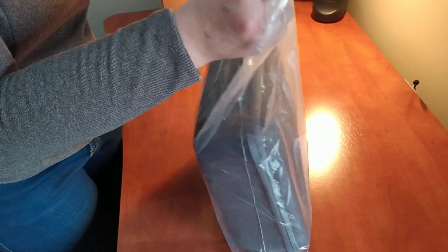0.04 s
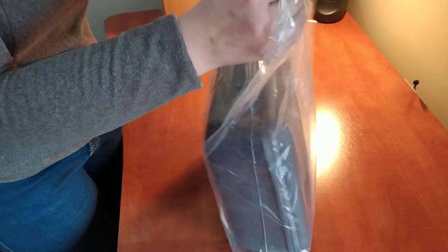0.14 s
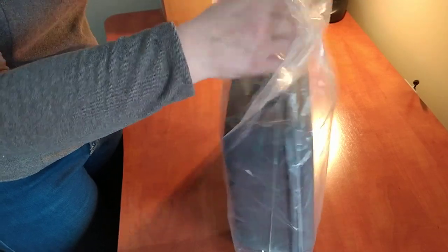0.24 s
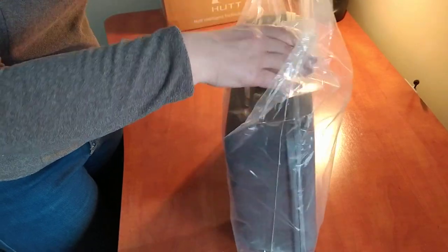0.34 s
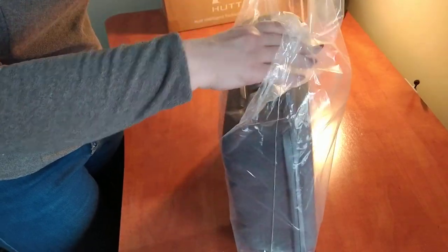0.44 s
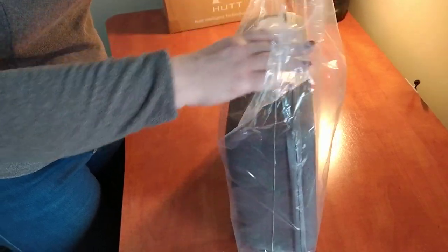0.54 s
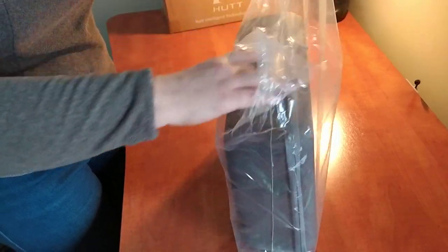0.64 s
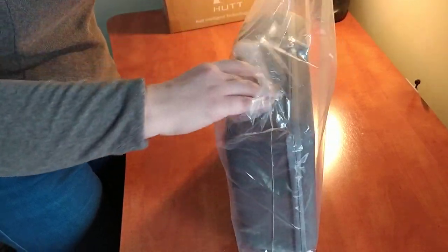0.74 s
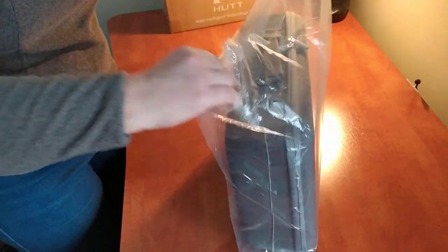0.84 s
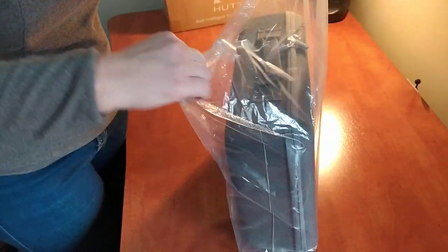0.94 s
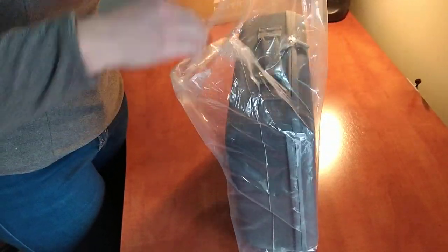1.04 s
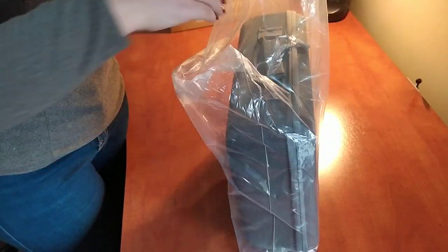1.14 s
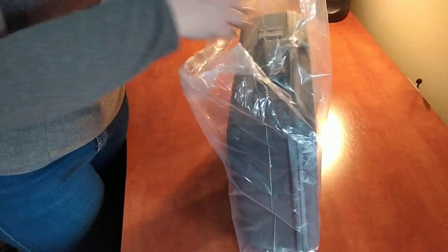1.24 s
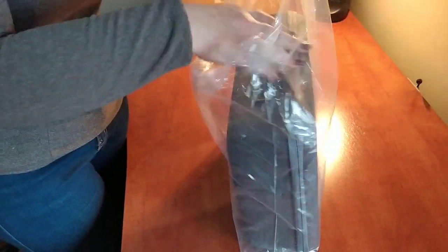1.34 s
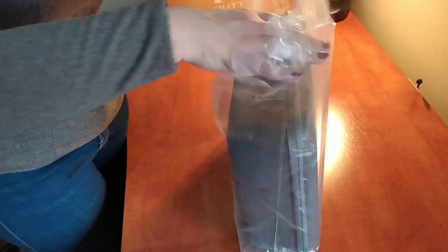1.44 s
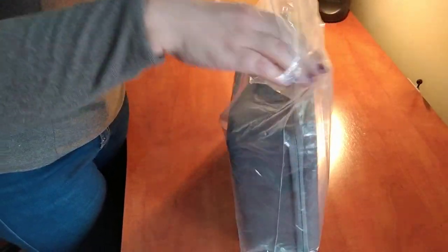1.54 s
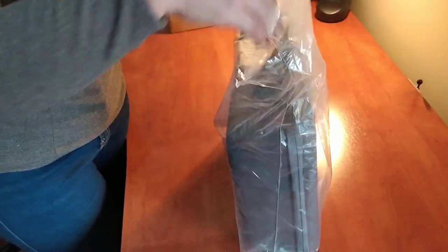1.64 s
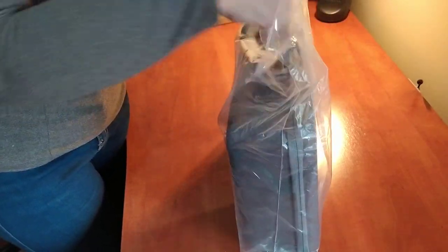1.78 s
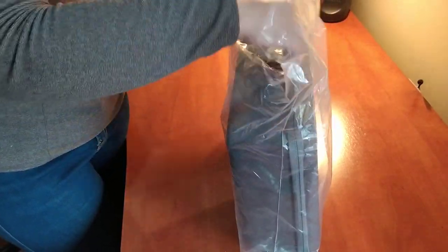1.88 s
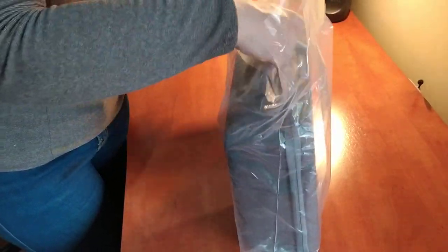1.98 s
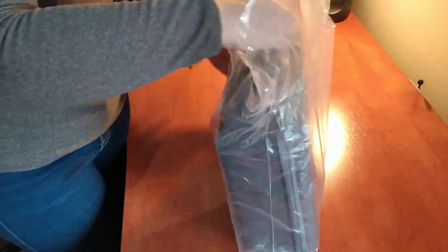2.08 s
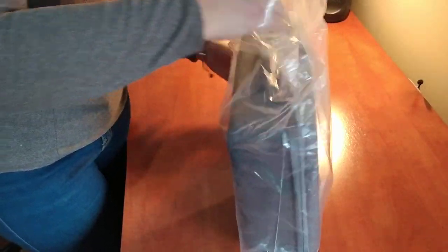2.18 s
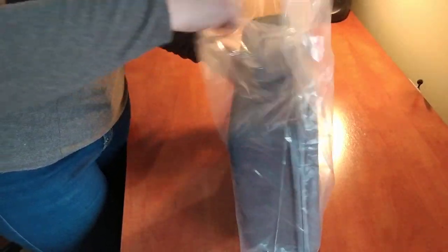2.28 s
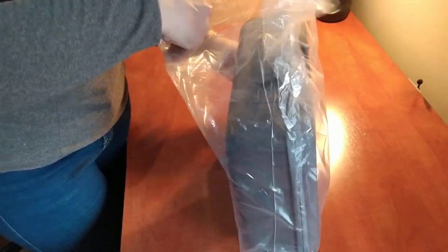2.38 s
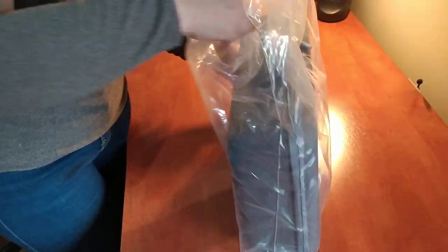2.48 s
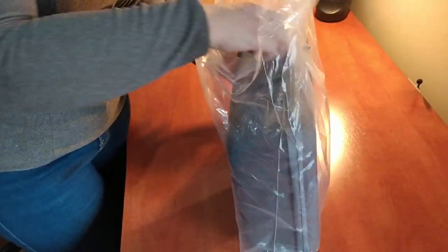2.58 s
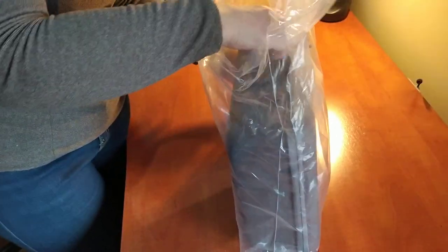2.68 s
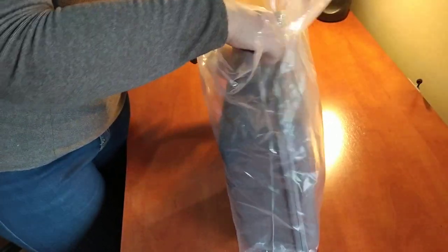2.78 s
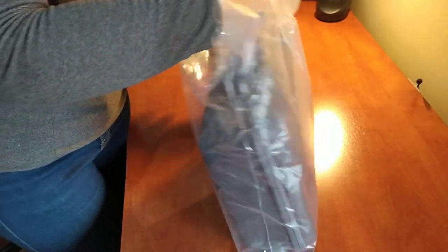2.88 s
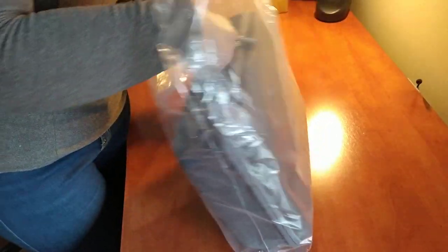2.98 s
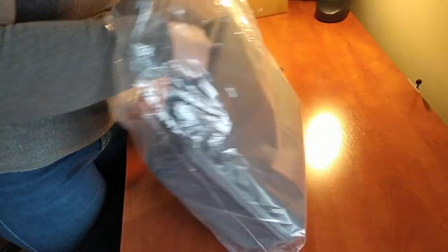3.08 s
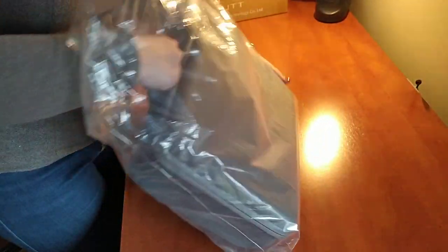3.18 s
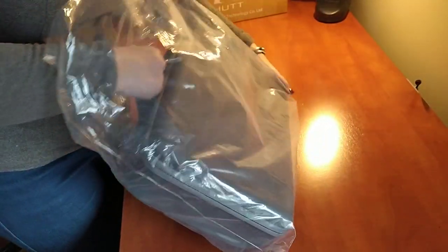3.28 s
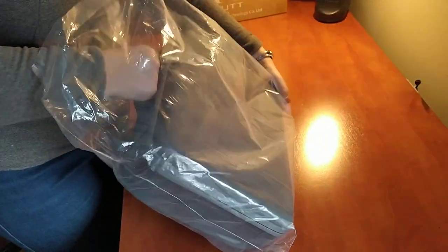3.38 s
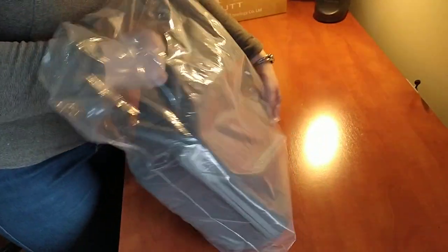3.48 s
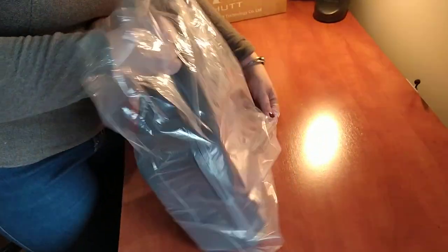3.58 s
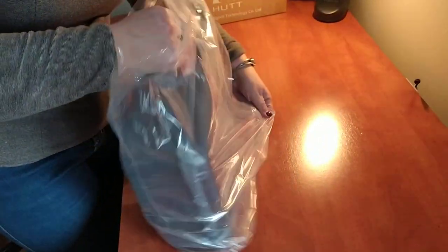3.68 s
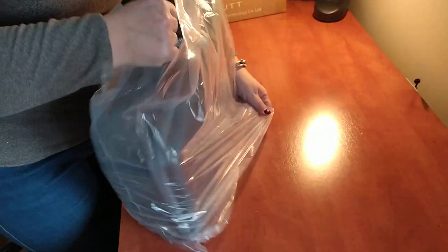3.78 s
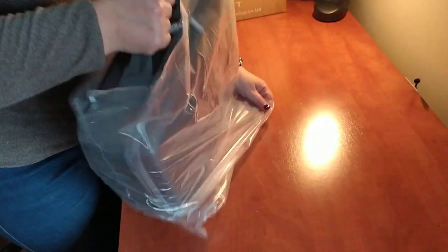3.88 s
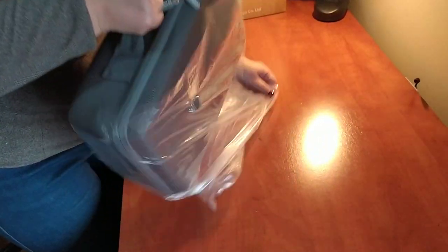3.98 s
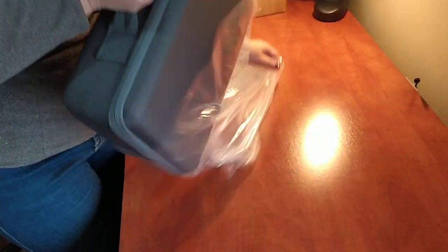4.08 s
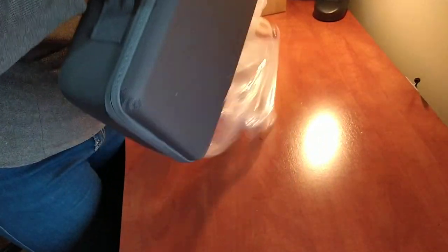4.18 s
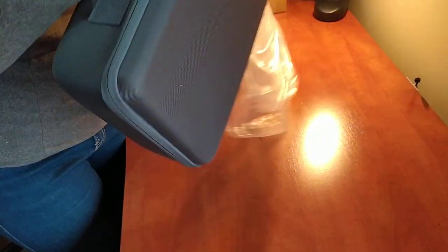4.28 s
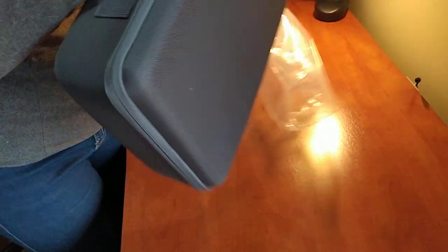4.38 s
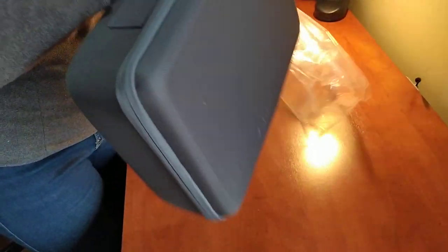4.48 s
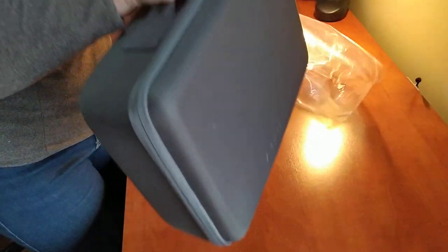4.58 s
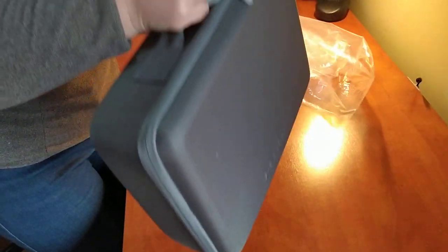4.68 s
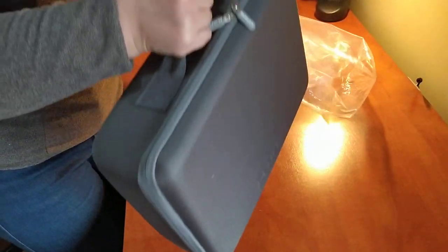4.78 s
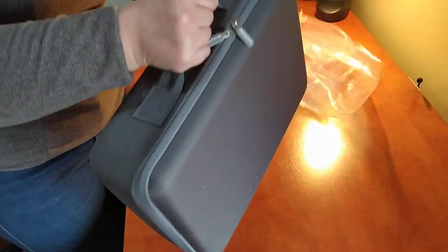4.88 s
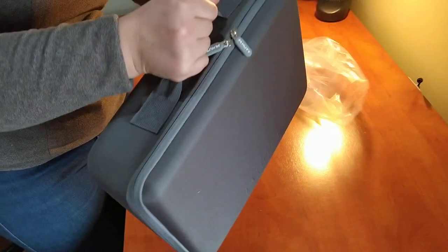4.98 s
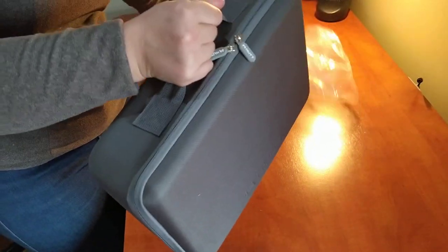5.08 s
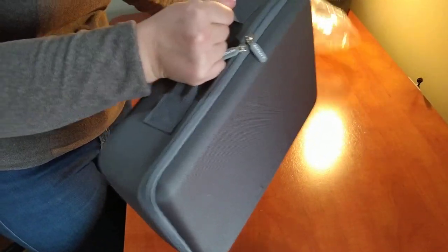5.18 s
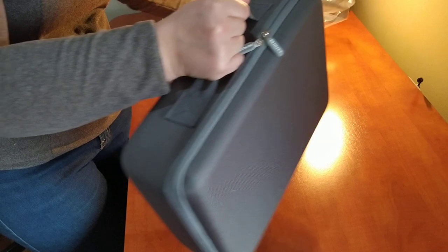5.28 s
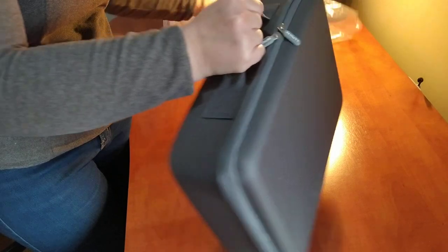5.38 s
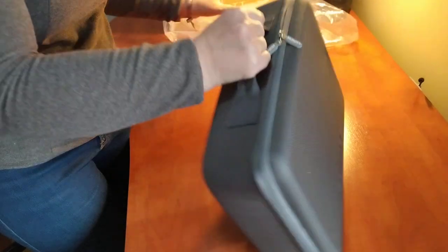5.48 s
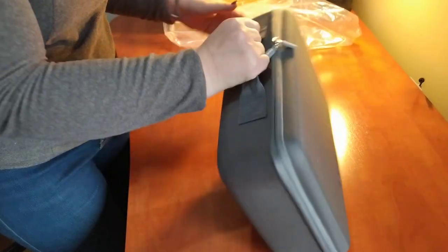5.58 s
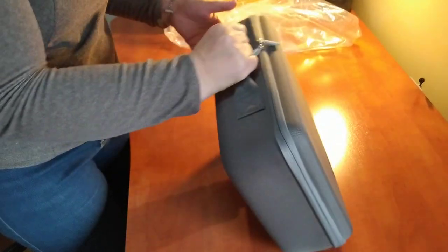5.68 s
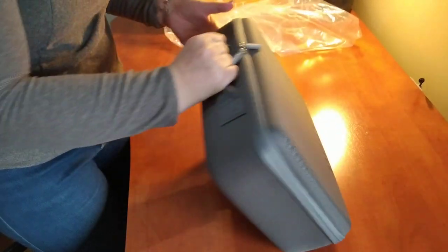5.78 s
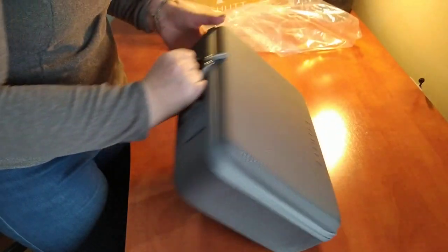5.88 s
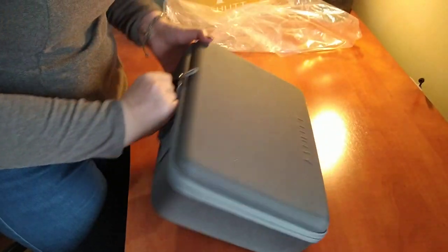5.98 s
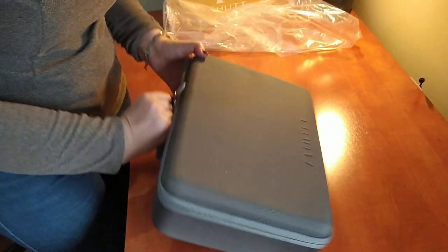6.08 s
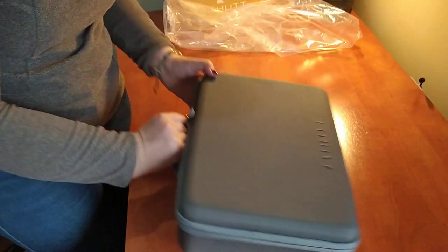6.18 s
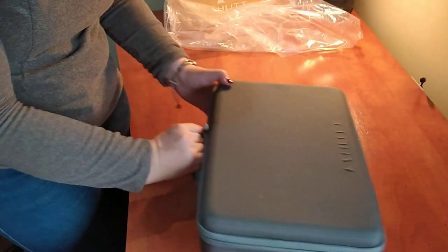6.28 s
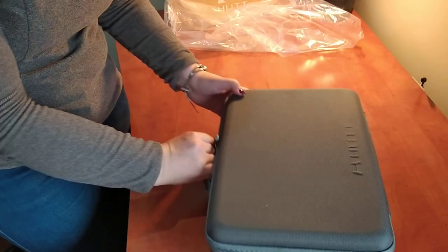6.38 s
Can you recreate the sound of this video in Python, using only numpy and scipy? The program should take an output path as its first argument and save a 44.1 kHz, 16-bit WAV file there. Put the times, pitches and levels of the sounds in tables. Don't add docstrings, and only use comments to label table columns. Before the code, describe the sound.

Close, bright plastic rustling with sharp crackles and small bumps, ending in a rattling double thump as a hollow case drops flat on a table.

```python
import sys
import numpy as np
from scipy import signal
from scipy.fft import rfft, irfft, next_fast_len
from scipy.io import wavfile
from scipy.ndimage import uniform_filter1d, minimum_filter1d

SR = 44100
rng = np.random.default_rng(int(sys.argv[2]) if len(sys.argv) > 2 else 0)


def natural_amplitude(level_db):
    exponent = np.asarray(level_db, float) / 20
    return 10 ** exponent


def store_wav(level_fs):
    pcm = np.round(np.clip(np.atleast_2d(level_fs), -1, 1) * 32767)
    wavfile.write(sys.argv[1], SR, pcm.T.astype(np.int16))


N = 283987
SIZE = next_fast_len(N + SR)
HZ = np.maximum(np.arange(SIZE // 2 + 1) * SR / SIZE, 1)
ROOM_DB = -13

# (frequency [Hz], density [dB per Hz])
WIDE_TONE = [(320, -26.5), (550, -18.5), (679, -9.5), (901, -7), (1210, -7.5), (1590, -3), (2480, 0.5),
             (3210, -4.5), (3800, -6.5), (4940, -15.5), (8360, -120)]
# (time [s], wide folds over fine creases [dB], weight on table [dB], left-right [dB])
GRIP = [(0, -7, -20.5, -1), (.45, -9, -22, 0.5), (.75, -5, -21, -1), (1.1, -8.5, -22, -0.5),
        (1.6, -7.5, -19, -0.5), (2, -7, -18.5, -1.5), (2.5, -5.5, -19.5, 0), (2.9, -6, -13, -1),
        (3.3, -7, -15.5, -1), (3.7, -8, -22, 0), (4.2, -7.5, -18, 1.5), (4.55, -10, -29, -1),
        (4.9, -3.5, -18.5, -2), (5.2, -7, -19, -0.5), (5.6, -4, -17, -3), (5.9, -3, -14, -0.5),
        (6.15, -2.5, -2.5, 5), (6.44, -12.5, -10.5, -2)]


def rms_one(x):
    return x / np.sqrt(np.mean(x ** 2) + 1e-20)


def in_time(rows):
    s, *columns = np.transpose(rows)
    return [np.interp(np.arange(N) / SR, s, c) for c in columns]


def at_hz(points):
    hz, value = np.transpose(points)
    return np.interp(np.log(HZ), np.log(np.maximum(hz, 1)), value)


def colour(x, points):
    magnitude = rms_one(natural_amplitude(np.maximum(at_hz(points), -70)))
    cepstrum = irfft(np.log(magnitude), SIZE)
    cepstrum[1:SIZE // 2] *= 2
    cepstrum[SIZE // 2 + 1:] = 0
    return irfft(rfft(x, SIZE) * np.exp(rfft(cepstrum)), SIZE)[..., :N]


def fade(x, decay_s):
    return signal.lfilter([1], [1, -np.exp(-1 / (decay_s * SR))], x + 1e-18)


def drift(rate_hz):
    decay_s = 1 / (2 * np.pi * rate_hz)
    slow = fade(fade(rng.standard_normal(N + SR), decay_s), decay_s)
    return rms_one(slow[SR:])


def ring(clicks, modes, gains_db=0):
    out = 0
    gains_db = gains_db + np.zeros(len(modes))
    for k, ((hz, level_db, t60_s), gain_db) in enumerate(zip(modes, gains_db)):
        r = natural_amplitude(-60 / (t60_s * SR))
        w = 2 * np.pi * hz / SR
        mode = signal.lfilter([0, np.sin(w)], [1, -2 * r * np.cos(w), r * r], clicks + 1e-18)
        out = out + (-1) ** k * natural_amplitude(level_db + gain_db) * mode
    return out


def ticks(per_s, spread_db, tick_s, clump_db, smooth):
    born = rng.random(N) < per_s * natural_amplitude(clump_db * drift(14)) / SR
    power = natural_amplitude(2 * spread_db * np.minimum(rng.exponential(1, N), 4)) * born
    gate = fade(power, tick_s)
    gate = np.sqrt((1 - smooth) * gate / gate.mean() + smooth)
    return gate * rng.standard_normal((2, N))


def strokes(rows, rest_db):
    s, level_db, rise_s, hold_s, fall_s = np.transpose(rows)[..., None]
    t = np.arange(0, N + 128, 128) / SR
    before = np.maximum(s - t, 0) / np.maximum(rise_s, .005)
    after = np.maximum(t - s - np.abs(hold_s), 0) / np.maximum(fall_s, .005)
    sunk_db = 20 * np.minimum(before + after, 10)
    power = np.sum(natural_amplitude(level_db - sunk_db) ** 2, axis=0) + natural_amplitude(rest_db) ** 2
    return np.interp(np.arange(N) / SR, t, 10 * np.log10(power))


def ports(mid_side):
    # (frequency [Hz], left-right likeness [0..1])
    likeness = [(60, 0.47), (130, 0.96), (290, 0.9), (640, 0.5), (1400, 0.12), (15000, 0.012)]
    mid, side = rfft(mid_side, SIZE)
    alike = np.clip(at_hz(likeness), 0, 1)
    mid = np.sqrt((1 + alike) / 2) * mid
    side = np.sqrt((1 - alike) / 2) * side
    return irfft(np.array([mid + side, mid - side]), SIZE)[:, :N]


def still_air():
    # (frequency [Hz], density [dB per Hz])
    air_tone = [(12, -38), (24, 8.5), (75, -4), (228, 4), (574, -16), (759, 0.5), (2200, -4), (5230, -16.5),
                (9400, -23), (14300, -53), (16000, -52)]
    return natural_amplitude(-57.5) * ports(colour(rng.standard_normal((2, N)), air_tone))


def room(x):
    t60_s, wall_cut_hz = 0.27, 12800
    w = 2j * np.pi * HZ / SR
    dull = 1 / (1 + 1j * HZ / wall_cut_hz)
    lags_s = rng.uniform(.009, .035, 16)
    loops = [natural_amplitude(-60 * lag_s / t60_s) * dull * np.exp(-w * lag_s * SR) for lag_s in lags_s]
    tails = np.array([g / (1 - g) * (-1) ** (k // 2) for k, g in enumerate(loops)])
    tails = tails.reshape(8, 2, -1).sum(axis=0)
    return ports(irfft(rfft(x, SIZE) * tails, SIZE)[:, :N])


def handling():
    # (time at full strength [s], level [dB], rise [s], hold [s], fall [s])
    film_moves = [(0.0, -25, 0.048, 0.0041, 0.097), (0.1, -33.5, 0.15, 0.055, 0.11),
                  (0.25, -27.5, 0.043, .005, 0.19), (0.41, -29.5, 0.19, 0.0045, 0.11),
                  (0.48, -42, 0.03, 0.17, 0.68), (0.78, -35.5, .03, 0.23, 0.19),
                  (0.95, -34, 0.11, 0.23, 0.053), (1.2, -66, .05, 0.021, 0.31), (1.34, -49, .2, 0.023, 0.058),
                  (1.445, -40.5, 0.014, 0.12, 0.14), (1.585, -25.5, 0.13, 0.031, 0.15),
                  (1.73, -38, 0.079, 0.0057, 0.099), (1.9, -70, .2, .03, .2), (1.99, -41, 0.16, 0.12, 0.13),
                  (2.15, -40, 0.053, .1, .1), (2.28, -31, 0.03, 0.0068, .12), (2.46, -34.5, 0.16, 0.053, 0.1),
                  (2.71, -48, 0.97, .005, 0.25), (2.85, -48.5, 0.07, 0.062, 0.11),
                  (2.975, -45.5, 0.02, 0.03, 0.19), (3.08, -51.5, 0.074, 0.092, 0.045),
                  (3.221, -40.5, .01, 0.054, 0.2), (3.379, -34.5, 0.045, .005, 0.17),
                 (3.46, -37, 0.094, 0.12, 0.081), (3.553, -33, 0.032, 0.12, .1),
                 (3.687, -22, 0.048, .003, 0.063), (3.747, -27.5, 0.056, 0.03, 0.41),
                 (4.153, -26, 0.47, 0.098, 0.25), (4.59, -39, 0.18, 0.076, 0.27),
                 (4.74, -46.5, 0.097, 0.017, 0.28), (4.9, -78, .2, 0.044, .1),
                 (5.001, -32.5, 0.045, 0.11, 0.24), (5.132, -33, 0.21, 0.076, 0.29),
                 (5.366, -36, 0.11, .005, 0.19), (5.497, -46, 0.16, .005, 0.063),
                 (5.596, -55.5, .1, 0.027, 0.077), (5.694, -52, 0.0073, 0.034, .1),
                 (5.807, -46.5, 0.055, .005, 0.048), (5.871, -43.5, 0.054, 0.0055, 0.081),
                 (5.99, -59, 0.24, 0.05, 0.18), (6.24, -50, 0.19, .3, 0.076)]
    return strokes(film_moves, rest_db=-81.5)


def table():
    # (frequency [Hz], level [dB], t60 [s])
    boom_modes = [(28, 2, .2), (39, 6, 0.26), (58, 10.5, 0.22), (98, 3.5, 0.2)]
    # (frequency [Hz], density [dB per Hz])
    drag_tone = [(47, -38), (80, -18), (129, -10), (157, -1), (206, -1.5), (402, -2), (445, -2), (558, -13),
                 (700, -1), (910, -26), (1540, -120)]
    # (frequency [Hz], density [dB per Hz])
    slide_tone = [(120, -29), (180, -1.5), (230, -1.5), (300, -1.5), (380, -19), (520, -20.5), (900, -44)]
    # (time at full strength [s], level [dB], rise [s], hold [s], fall [s])
    drag_rows = [
        (1.0, -48, 0.22, 0.023, 0.045),
        (2.8, -48, 0.04, .01, 0.18),
        (3.41, -57, 0.054, .005, 0.34),
        (5.38, -52, 0.15, .005, 0.22),
        (5.78, -36.5, .03, 0.065, 0.17),
    ]
    # (time at full strength [s], level [dB], rise [s], hold [s], fall [s])
    lean_rows = [(0.02, -43.5, .1, .05, 0.24), (0.5, -45, 0.13, 0.0059, 0.15), (1.04, -53, 0.27, .005, .08),
                 (1.58, -44.5, .05, .005, .08), (2.26, -69, .2, .005, .2), (2.8, -57, .1, .005, .3),
                 (4.18, -64, .12, .005, .24), (4.66, -58, .09, .005, .14), (4.91, -56, 0.16, .005, .2),
                 (5.24, -65, 0.083, .005, .05), (5.702, -23, 0.0055, 0.055, .15),
                 (5.84, -26, .05, 0.047, 0.144), (6.0, -50, .1, .1, 0.55)]
    # (time at full strength [s], level [dB], rise [s], hold [s], fall [s])
    slide_rows = [(6.04, -48, .03, 0.0023, .04), (6.15, -46, 0.084, 0.093, .04)]

    weight_db = in_time(GRIP)[1]
    drag = np.hypot(natural_amplitude(handling() + weight_db), natural_amplitude(strokes(drag_rows, rest_db=-68)))
    grain = ticks(per_s=160, spread_db=2.0, tick_s=0.026, clump_db=3.5, smooth=0.05)
    drag = colour(drag * grain, drag_tone)
    rub = colour(natural_amplitude(strokes(slide_rows, rest_db=-100)) * rng.standard_normal((2, N)), slide_tone)
    rumble_db = strokes(lean_rows, rest_db=-78) + 3 * drift(4)
    rumble = natural_amplitude(rumble_db - 12.0) * rms_one(ring(rng.standard_normal(N), boom_modes))
    return ports(drag + rub) + rumble


def push_away():
    # (time at full strength [s], level [dB], rise [s], hold [s], fall [s])
    push_rows = [(6.25, -45, 0.22, .3, .1)]
    # (frequency [Hz], density [dB per Hz])
    push_tone = [(5000, -28), (7500, -8), (9700, 0), (12500, -12), (15500, -25)]
    grain = ticks(per_s=1500, spread_db=2.0, tick_s=.001, clump_db=2.0, smooth=.6)
    return colour(natural_amplitude(strokes(push_rows, rest_db=-100)) * grain, push_tone)


def slaps():
    # (time [s], peak [dB], first pitch [Hz], last pitch [Hz])
    slap_rows = [
        (4.6429, -22, 312, 139.6),
        (5.853, -24, 233, 151.4),
        (5.876, -23, 188, 148),
    ]
    sag_s, decay_s = 0.015, 0.025
    out = np.zeros(N + SR)
    t = np.arange(SR // 4) / SR
    for s, peak_db, first_hz, last_hz in slap_rows:
        cycles = last_hz * t + (first_hz - last_hz) * sag_s * (1 - np.exp(-t / sag_s))
        at = round(s * SR)
        out[at:at + len(t)] -= natural_amplitude(peak_db) * np.sin(2 * np.pi * cycles) * np.exp(-t / decay_s)
    return signal.sosfilt(signal.butter(2, 115, "high", fs=SR, output="sos"), out[:N])


def case():
    # (time [s], peak [dB], favoured frequency [Hz], shell clack [dB], judder [ms])
    knock_rows = [(0.25, -32, 352, 2, 12), (1.564, -34, 695, -22, 29), (2.783, -37.5, 192, -3.5, 18),
                  (2.882, -37.5, 210, -2, 7.9), (2.968, -42.5, 355, -4, 21),
                  (3.0194, -31.5, 259, 11.5, 6.6), (3.151, -41, 197, 2, 11), (3.585, -38, 223, -15, 45),
                  (4.643, -26.5, 620, -2, 8.8), (4.689, -31, 350, -7, 11), (5.288, -38.5, 370, -8, 26),
                  (5.355, -27, 664, -2, 26), (5.69, -20, 300, -1.5, 14), (5.723, -17, 130, -4.5, 15.6),
                  (5.735, -25, 397, -10, 27), (5.775, -31, 180, -4, 15), (5.806, -26, 298, -3, 26),
                  (5.834, -19.5, 420, 4.5, 17.5), (5.846, -19.5, 480, -12, 13),
                  (5.856, -11.5, 138, -32, 18), (5.875, -23, 149, -9, 44)]
    # (frequency [Hz], level [dB], t60 [s])
    body_modes = [(120.2, -5, 0.14), (146.6, -7, 0.14), (182.5, -10.5, 0.096), (242, -0.5, 0.042),
                  (293, 0, 0.048), (348.3, -6.5, 0.16), (437, -3, 0.044), (523, -5, 0.045),
                  (603, -5, 0.064), (671.6, -11, 0.13)]
    # (frequency [Hz], level [dB], t60 [s])
    shell_modes = [(826, -2.5, 0.014), (960, -5.5, 0.055), (1004, 1, 0.012), (1236, 1, 0.016),
                   (1300, 3.5, 0.0085), (1650, -0.5, 0.011), (1880, 2.5, 0.02), (2170, 7, 0.0075),
                   (2540, -7, 0.023), (2860, -10, 0.0099), (3370, -37, 0.008), (4150, -40, 0.009)]
    contact_ms, hardness = 0.88, 0.22

    out = np.zeros(N + SR)
    skin_band = signal.butter(3, [1750, 2350], "band", fs=SR, output="sos")
    t = np.arange(SR // 2) / SR
    noises = rng.standard_normal((len(knock_rows), len(t)))
    for (s, peak_db, spot_hz, clack_db, judder_ms), noise in zip(knock_rows, noises):
        push_ms = contact_ms * natural_amplitude(-hardness * clack_db)
        push = np.sin(np.pi * np.minimum(t * 1000 / push_ms, 1)) ** 2
        judder = natural_amplitude(-28) * noise * np.exp(-t * 1000 / judder_ms)
        reach_db = -3.5 * np.log2(np.array(body_modes)[:, 0] / spot_hz) ** 2
        body = ring(push / push.sum() + judder, body_modes, reach_db)
        shell = ring(natural_amplitude(-13.5) * np.exp(-t / .00005) + natural_amplitude(4.5) * judder, shell_modes)
        shell += natural_amplitude(18.0) * signal.sosfilt(skin_band, noise * np.exp(-t / 0.004))
        at = round(s * SR)
        out[at:at + len(t)] += natural_amplitude(peak_db) * (natural_amplitude(-3.5) * body + natural_amplitude(clack_db - 2.5) * shell)
    return signal.sosfilt(signal.butter(2, 110, "high", fs=SR, output="sos"), out[:N])


def snaps():
    # (time [s], peak [dB], wide-fold share [dB], length [ms])
    snap_rows = [(0.0884, -9.5, -35, 4), (0.2513, -14, -23, 12), (0.393, -18.5, -21, 7.6),
                 (0.4848, -18, -21, 10), (0.5654, -17.5, -18.5, 6.6), (0.6837, -24, -17, 6.7),
                 (0.7367, -21.5, -11, 3.2), (0.7639, -25, -14, 13), (0.818, -17, -18, 7),
                 (0.8664, -21.5, -35, 39), (1.018, -18, -24, 3.5), (1.262, -27.5, -12, 8.6),
                 (1.4394, -23, -24, 5.9), (1.4651, -20.5, -15.5, 6.9), (1.4885, -15, -27, 3.6),
                 (1.5682, -19.5, -10.5, 7), (2.0976, -19.5, -13.5, 8.2), (2.1799, -27.5, -30, 48),
                 (2.2762, -14, -38, 7.2), (2.4004, -25, -9, 12), (3.2208, -33.5, -5.5, 12),
                 (3.3608, -18.5, -29, 4.5), (3.8225, -22, -21, 2.0), (3.868, -12.5, -43, 7.2),
                 (3.9172, -11, -42, 4.5), (4.0981, -16.5, -19, 15), (4.8468, -27.5, -18, 11),
                 (5.0077, -19, -17, 24), (5.3583, -24, -14, 10), (5.4865, -20, -18.5, 4.3)]
    # (time [s], peak [dB])
    ping_rows = [(0.2263, -31), (0.611, -28.5), (0.629, -27.5), (0.929, -41), (1.0863, -43),
                 (1.1582, -20.5), (1.948, -54), (1.96, -27), (2.0535, -29), (2.248, -23.5), (2.4609, -26),
                 (2.544, -26.5), (2.701, -33.5), (2.846, -49), (2.9697, -34.5), (3.2006, -31.5),
                 (3.251, -29), (3.2888, -27.5), (3.381, -25.5), (3.542, -23), (3.685, -23), (4.016, -31),
                 (4.377, -22), (4.497, -33), (4.561, -31), (4.7397, -26), (4.7595, -26.5), (4.9802, -31),
                 (5.112, -23), (5.41, -26)]
    # (time [s], peak [dB])
    tick_rows = [(0.142, -27.5), (0.345, -23), (0.894, -22), (0.931, -23), (1.057, -21), (1.905, -42),
                 (2.441, -23), (2.894, -35), (3.159, -40), (3.2087, -30), (3.401, -22), (3.499, -31),
                 (3.689, -29), (3.703, -21), (3.773, -16), (3.83, -13.5), (4.076, -23), (4.114, -14),
                 (4.162, -13), (4.214, -22), (4.902, -39), (4.942, -43)]
    # (frequency [Hz], density [dB per Hz])
    snap_tone = [(1900, -22.5), (3300, -13), (5200, -9.5), (7600, -4.5), (9500, 3), (10900, -3),
                 (12800, -14.5), (15900, -18.5), (16500, -40)]
    ping_wide_db, ping_ms = -16.5, 10
    tick_wide_db, tick_ms = -25, 2.3
    scatter_db = 2

    fine, wide = np.zeros((2, 2, N))
    t = np.arange(SR // 20) / SR
    rows = snap_rows + [(s, peak_db, ping_wide_db, ping_ms) for s, peak_db in ping_rows]
    rows = rows + [(s, peak_db, tick_wide_db, tick_ms) for s, peak_db in tick_rows]
    noises = rng.standard_normal((len(rows), 3, len(t)))
    for (s, peak_db, wide_db, ms), noise in zip(rows, noises):
        pan_db = scatter_db * noise[2, -1]
        ragged = natural_amplitude(1.95 * uniform_filter1d(noise[2], size=20) * np.sqrt(20))
        shape = np.exp(-t * 1000 / ms) * ragged + natural_amplitude(-1) * np.exp(-t / .0008)
        pan = natural_amplitude(pan_db / 2 * np.array([[1], [-1]]))
        burst = natural_amplitude(peak_db - 8.5) * shape * noise[:2] * pan
        at = round(s * SR)
        fine[:, at:at + len(t)] += burst
        wide[:, at:at + len(t)] += natural_amplitude(wide_db + 7.5) * burst
    return colour(fine, snap_tone) + colour(wide, WIDE_TONE)


def patches(x, patchy_db):
    _, _, cells = signal.stft(x, nperseg=512)
    chance = rng.standard_normal(cells.shape[-2:])
    chance = uniform_filter1d(uniform_filter1d(chance, size=6, axis=0), size=5, axis=1)
    flicker = rms_one(natural_amplitude(patchy_db * rms_one(chance)))
    return signal.istft(cells * flicker, nperseg=512)[1][..., :N]


def film():
    # (frequency [Hz], density [dB per Hz])
    fine_tone = [(1940, -28), (3300, -16), (3850, -17), (5180, -10), (7610, -6), (9500, 1), (10700, -4),
                 (12800, -17.5), (13900, -21.5), (15900, -25.5), (16500, -48)]
    fine_db = handling()
    wide_db, _, pan_db = in_time(GRIP)
    wide_db = wide_db + drift(1.45)
    pan_db = pan_db + drift(2.8)
    shared = ticks(per_s=800, spread_db=2.5, tick_s=.001, clump_db=4.0, smooth=.5)
    folds = ticks(per_s=300, spread_db=4.5, tick_s=.005, clump_db=4.0, smooth=.35)
    fine = colour(natural_amplitude(fine_db) * shared, fine_tone)
    wide = colour(natural_amplitude(fine_db + wide_db + 1.54) * (0.64 * shared + 0.73 * folds), WIDE_TONE)
    return ports(patches(fine + wide, patchy_db=2.3)) * natural_amplitude(pan_db / 2 * [[1], [-1]])


def scene():
    flat_s, flat_damp_db = 5.897, 5
    left_lag = -10
    choke_db = -flat_damp_db * np.clip((np.arange(N) / SR - flat_s) / .006, 0, 1)
    bumps = natural_amplitude(choke_db) * (case() + slaps())
    direct = np.array([np.roll(bumps, left_lag), bumps])
    bag = film() + snaps()
    echoes = natural_amplitude(ROOM_DB) * room(bag[0]) + natural_amplitude(ROOM_DB - 4.5) * room(bumps)
    return bag + table() + direct + echoes + still_air() + push_away()


def mute_weak_spots(x):
    # (frequency [Hz], share of neighbourhood power below which a spot is muted [ratio])
    mute_share = [(2300, 0), (3000, .7), (7500, .7), (8500, .15), (10500, .15), (12000, 1.05)]
    sharp_front = 8

    def around(p):
        return uniform_filter1d(uniform_filter1d(p, size=32, axis=1), size=4, axis=2)

    mid_side = np.array([x[0] + x[1], x[0] - x[1]]) / 2
    hz, _, cells = signal.stft(mid_side, SR, nperseg=2048, noverlap=1536)
    power = np.abs(cells) ** 2 + 1e-24
    nearby = around(power)
    share = np.interp(hz, *np.transpose(mute_share))[:, None]
    kept = uniform_filter1d(power, size=5, axis=1) > share * nearby
    treble = uniform_filter1d(np.sum(np.diff(mid_side) ** 2, axis=0), size=64) + 1e-20
    peak = -minimum_filter1d(-treble, size=1536)
    sharp = peak / uniform_filter1d(treble, size=1536) > sharp_front
    kept = kept | sharp[np.minimum(512 * np.arange(kept.shape[2]), N - 2)]
    makeup = np.sqrt(nearby / np.maximum(around(power * kept), nearby / 4))
    mid, side = signal.istft(cells * kept * makeup, SR, nperseg=2048, noverlap=1536)[1][:, :N]
    return np.array([mid + side, mid - side])


def band_limit(x):
    return signal.sosfilt(signal.butter(12, 16120, fs=SR, output="sos"), x)


def record(dry):
    # (frequency [Hz], left-right [dB])
    side_lean = [(60, 0.7), (110, -1.5), (200, 0.9), (380, -3.5), (700, 2.5), (1290, 1.5), (2380, 3),
                 (4400, -2), (8120, -3.5), (15000, 10.5)]
    lean = natural_amplitude(at_hz(side_lean) / 2 * np.array([[1], [-1]]))
    heard = irfft(rfft(dry, SIZE) * lean, SIZE)[:, :N]
    mix = mute_weak_spots(heard)
    return band_limit(mix)


dry = scene()
out = record(dry)
store_wav(out)
```